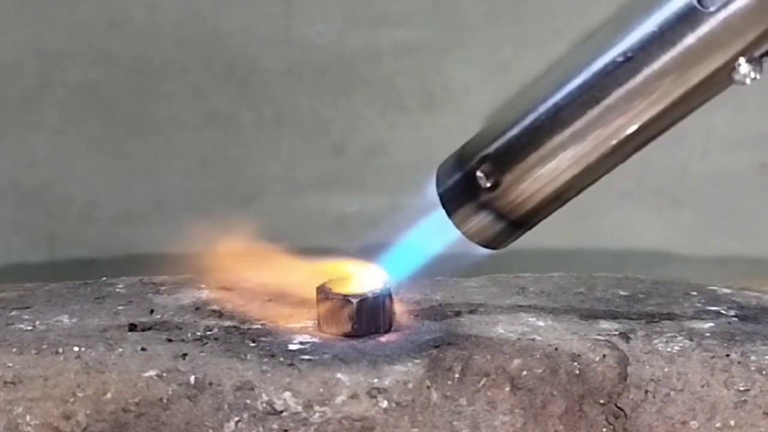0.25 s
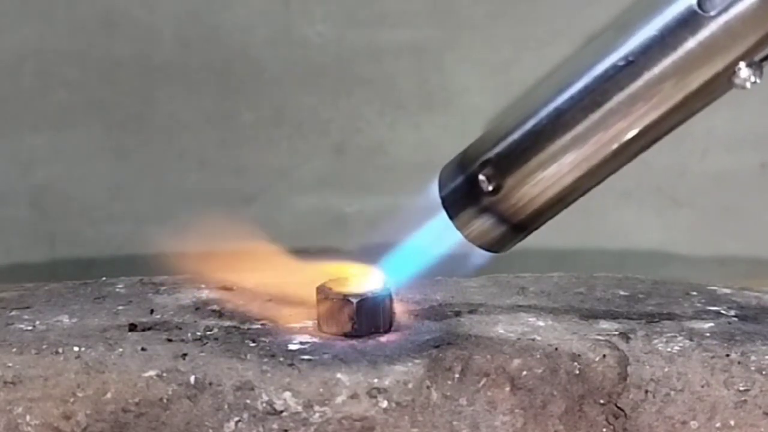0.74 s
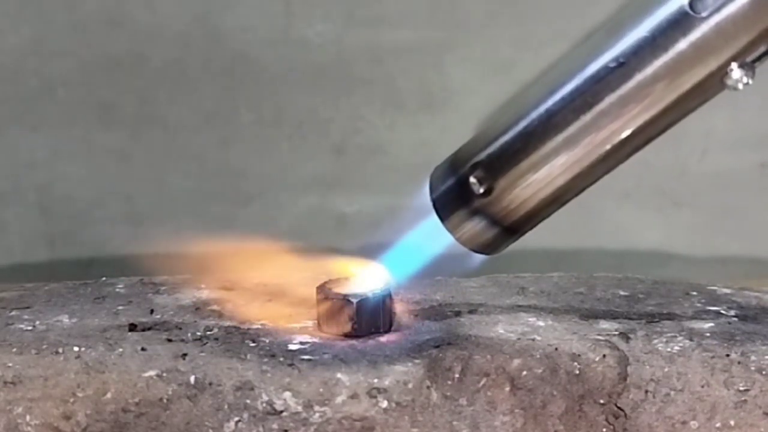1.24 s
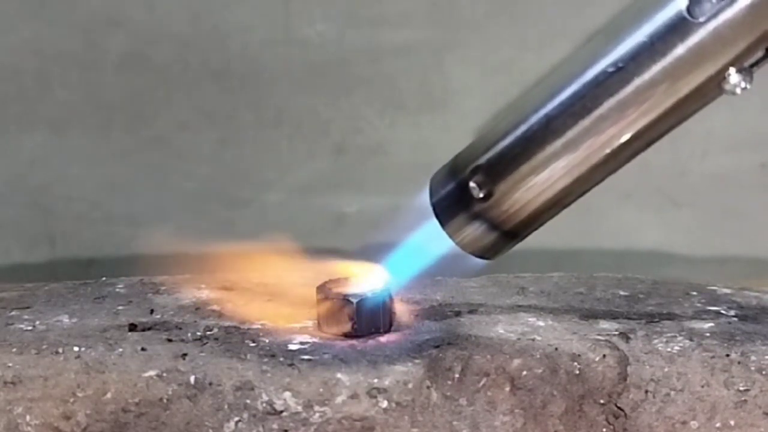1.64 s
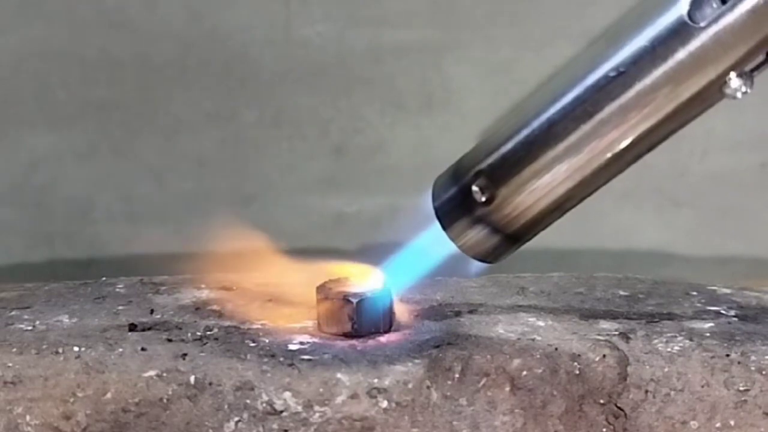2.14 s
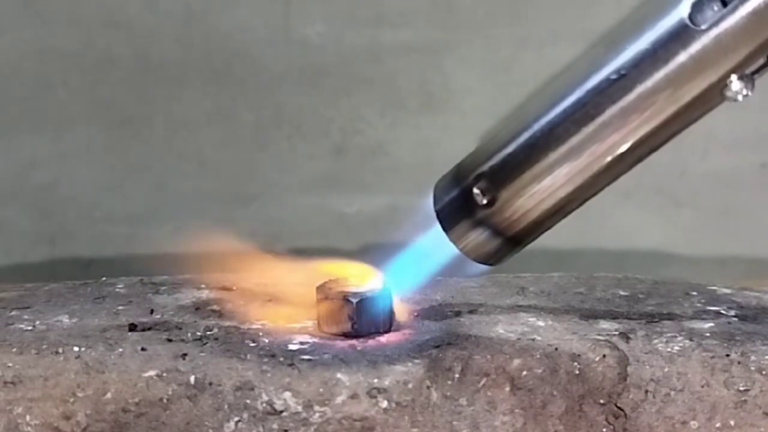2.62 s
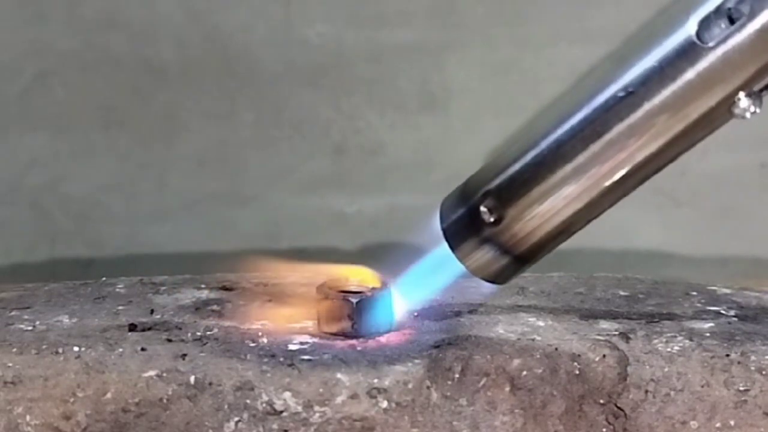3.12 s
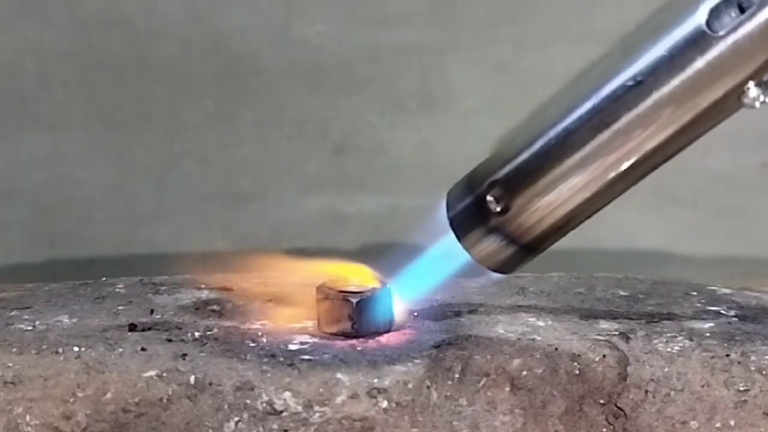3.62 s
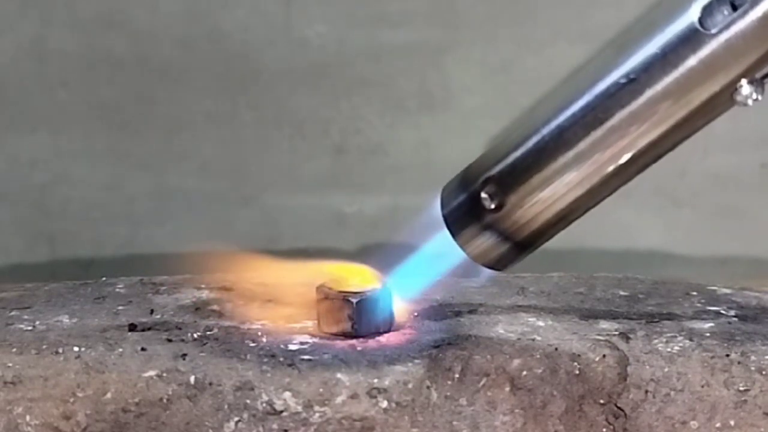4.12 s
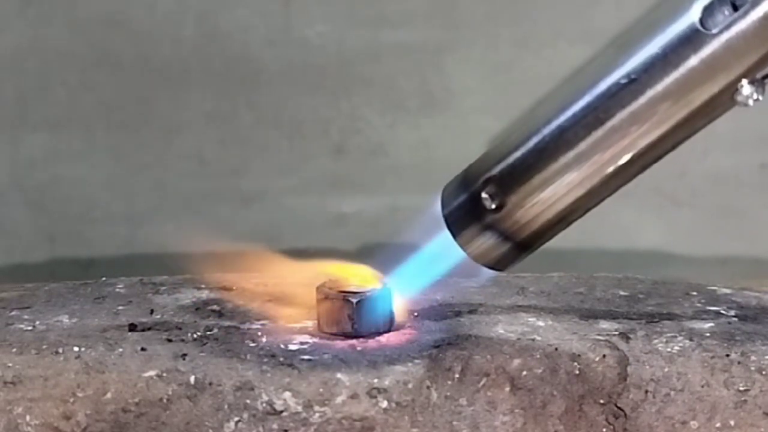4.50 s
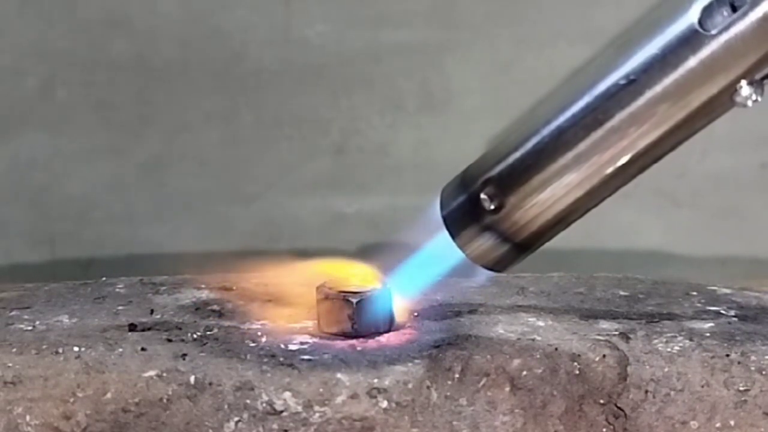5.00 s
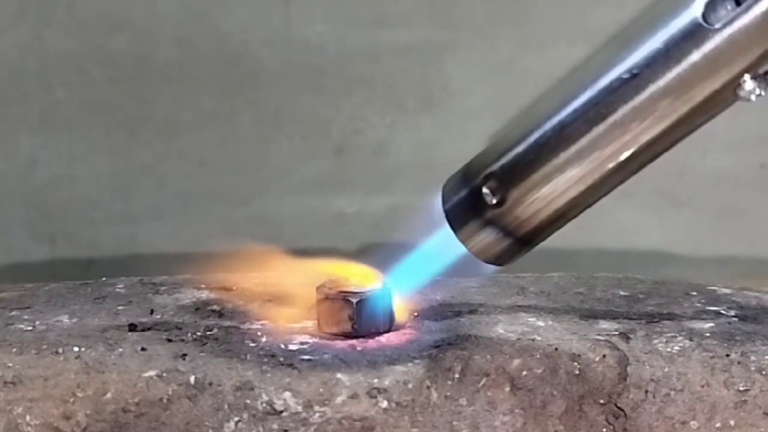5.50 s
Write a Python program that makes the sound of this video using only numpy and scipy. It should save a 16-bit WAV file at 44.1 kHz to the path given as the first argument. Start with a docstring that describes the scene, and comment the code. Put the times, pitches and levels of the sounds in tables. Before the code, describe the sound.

The steady, slightly hollow roar and hiss of a gas torch flame heating a small metal piece.

```python
"""Gas torch in a hard-walled room

A handheld torch plays on a small metal piece, close to a microphone with two openings (ports).
The swirling flame roars and the gas jet hisses; bench and walls colour both. The right port sits
behind a hollow that rings near 630 Hz, and it hears the jet about half a millisecond late."""
import sys
import numpy as np
from scipy import signal
from scipy.fft import rfft, irfft, next_fast_len
from scipy.io import wavfile
from scipy.ndimage import uniform_filter1d, minimum_filter1d

SR = 44100
rng = np.random.default_rng(int(sys.argv[2]) if len(sys.argv) > 2 else 0)


def dump_mix(stems):
    """Bounce the given channels to the path in sys.argv[1] as a 16-bit WAV at rate SR."""
    frames = np.atleast_2d(stems).T  # one column per channel
    limited = np.clip(frames, -1, 1)  # hard clip at full scale
    pcm = np.round(limited * 32767).astype(np.int16)
    wavfile.write(sys.argv[1], SR, pcm)


N = 253575
SIZE = next_fast_len(N + SR // 2)  # samples, with space for the echoes
HZ = np.arange(SIZE // 2 + 1) * SR / SIZE + 1e-3  # the frequencies of a spectrum


def torch_flame(count):
    """Swirling gas rumbles, roars and hisses: spectra of `count` noises that flicker together."""
    # slow drift in loudness: (time [s], rumble [dB], roar [dB], jet [dB])
    drift = [(0, 1, 0, -1.8), (.7, 0.5, 2.3, -2), (1.2, 1.1, 1.2, -1.5), (1.7, 1.2, 1.7, -0.8),
             (2.2, 1, 1.8, -0.2), (2.65, 2.1, 3.5, 1.3), (3.1, 0.7, 1.7, 0.5), (3.6, 0.7, 0.5, 0.4),
             (4.1, 1.8, -0.6, 2), (4.6, 1.1, 0.5, 1.3), (5.1, 1, 1.5, 0.1), (5.75, 2, 1.5, -0.1)]
    # quick random flicker: (rate [changes per s], depth [dB])
    flicker = [(4, .15), (10, .6), (20, .7)]
    # the flame's overall tone: (frequency [Hz], level [dB])
    tone = [(25, -19.0), (45, -25.5), (90, -14.4), (200, -17.9), (330, -6.6), (450, 0.0), (700, -10.9),
            (1100, -14.2), (1600, -19.1), (3000, -20.6), (4500, -26), (7000, -29.8), (10000, -40),
            (15000, -51.1)]
    # standing waves of tube, bench and walls: (frequency [Hz], width [Hz], gain [dB])
    standing_waves = [(86, 14, -1.4), (143, 18, 3.0), (187, 23, -7.5), (231, 29, 2.3), (278, 40, -1.5),
                      (313, 23, 6.3), (346, 19, -4.5), (358, 16, -1.9), (407, 34, 2.4), (432, 20, 1),
                      (452, 20, -2.5), (480, 28, 2), (525, 41, -1.8), (600, 32, 4.8), (632, 27, -5.7),
                      (717, 50, 5.5), (879, 53, -7.1), (991, 53, 2.6), (1030, 60, 1), (1076, 45, 4.8),
                      (1125, 30, -2.5), (1205, 25, -4.5), (1160, 50, 1), (1257, 60, 5), (1300, 25, -2.5),
                      (1372, 30, -7.2), (1483, 44, -2.5), (1530, 30, 2), (1680, 54, 3.0), (1835, 120, 4.6),
                      (2113, 172, -2), (2150, 40, -2), (2240, 50, 2), (2327, 189, 4.8), (2620, 485, -3.1),
                      (3070, 130, 2), (3350, 70, -2), (3500, 220, 1.5), (3820, 120, -1), (4159, 479, 1.6),
                      (4330, 100, 1), (4580, 180, -5.5), (4750, 150, 2), (4950, 100, -1), (5502, 442, -4.7),
                      (6050, 300, 3.8), (6470, 200, 2.2), (6740, 80, 2), (8650, 352, 2.6),
                      (9543, 264, -3.8), (11036, 895, -2.6), (12171, 326, 3.3), (12950, 500, 3.5),
                      (14300, 800, 4.5), (15150, 400, -7)]
    rumble_top_hz, roar_top_hz, hiss_from_hz = 500, 900, 6000
    times, rumble_db, roar_db, jet_db = np.transpose(drift)
    t = np.arange(SIZE) / SR
    spectra = np.zeros((count, len(HZ)), complex)
    for hz in 25 * 2. ** np.arange(10):  # bands an octave apart
        drift_db = rumble_db if hz < rumble_top_hz else roar_db if hz < roar_top_hz else jet_db
        db = np.interp(t, times, drift_db)
        if hz > hiss_from_hz:  # the nozzle's thin hiss follows the drift only in part
            db *= 0.22
        db += sum(depth_db * wander(rate) for rate, depth_db in flicker)
        # neighbouring bands add up to even power
        band = np.cos(np.pi / 2 * np.clip(np.log2(HZ / hz), -1, 1))
        spectra += band * rfft(from_db(db) * rng.standard_normal((count, SIZE)))
    return spectra * tone_curve(tone) * peaks_and_dips(standing_waves)


def right_port():
    """A filter: the hollow passes bass and rings; treble leaks in later round the microphone's body."""
    # how the body shades the treble: (frequency [Hz], gain [dB])
    shade = [(1000, -1.2), (1500, 1.4), (2700, -5.6), (3600, 0.5), (5000, -0.2), (7500, -8.8), (9300, 0.7),
             (15000, 0.2)]
    # extra lag from longer ways round the body: (frequency [Hz], phase lag [radians])
    detour_lag = [(600, 0), (900, .3), (1300, -.22), (1550, -2), (1950, -.6), (2220, 3.7), (2450, 4.2),
                  (2950, 6.3), (3740, 6.5), (4000, 12.2), (4330, 12.3), (4540, 13.3), (4650, 12.1),
                  (4850, 12.8), (5350, 12.9), (6000, 17.1), (6600, 17.8), (7000, 19.9), (9000, 26.8)]
    # peaks and dips at this port only: (frequency [Hz], width [Hz], gain [dB])
    colour = [(191, 9, -4.4), (236, 40, -3.1), (286, 23, -2.1), (348, 53, -2.0), (449, 26, -4),
              (480, 70, -2.5), (609, 66, 3.2), (637, 25, -5.1), (673, 46, 3.3), (798, 46, -2.6),
              (877, 54, 6.9), (1000, 120, -1.5), (1069, 45, -.5), (1160, 80, 1.5), (1205, 25, 3),
              (1260, 50, -2.5), (1372, 32, 8.9), (1419, 47, -7.4), (1473, 30, 6.0), (1610, 66, 1.7),
              (1675, 39, -5.8), (1797, 162, 4.6), (1980, 60, -2), (2078, 68, 4.5), (2158, 45, -4.2),
              (2225, 70, 5.5), (2270, 25, -5), (2770, 194, -2.3), (3050, 70, 3), (3180, 120, -1.5),
              (3500, 145, 3.5), (3810, 130, -6), (3950, 90, 3), (4305, 166, 2.8), (4570, 90, -2.5),
              (4974, 169, -2.8), (5200, 120, 1.5), (5506, 208, 2.9), (5850, 150, -2), (6010, 110, 1.5),
              (6409, 237, 2), (7200, 500, 2), (7800, 500, -2.5), (9200, 350, 4)]
    ring_hz, ring_width_hz = 634.4, 17
    leak_hz, lag_s = 838, .000567
    hollow = 1 / (1 - (HZ / ring_hz) ** 2 + 1j * HZ * ring_width_hz / ring_hz ** 2)
    delay = np.exp(-2j * np.pi * HZ * lag_s)
    leak = tone_curve(shade) * delay / (1 + (leak_hz / HZ) ** 2)
    detour = np.exp(-1j * np.interp(HZ, *np.transpose(detour_lag)))
    return (hollow + leak) * detour * peaks_and_dips(colour)


def near_echoes():
    """A filter for each port: the direct sound plus quick echoes off the bench and near walls."""
    # echoes compared with the direct sound: (frequency [Hz], level [dB])
    echo_levels = [(30, -24), (1150, -18), (1450, -8), (3000, -12), (6000, -12), (15000, -13)]
    decay_s = 0.19  # time to fade by 60 dB
    t = np.arange(SR // 2) / SR
    tails = rng.standard_normal((2, len(t))) * from_db(-60 * t / decay_s)
    tails /= np.sqrt(np.sum(tails ** 2, -1, keepdims=True))
    echo_gain = tone_curve(echo_levels)
    return (1 + echo_gain * rfft(tails, SIZE)) / np.sqrt(1 + echo_gain ** 2)


def room_wash(direct, scattered):
    """Blends in sound scattered round the room, different at each port, keeping the power the same."""
    # scattered sound compared with the direct sound: (frequency [Hz], level [dB])
    wash_levels = [(30, -19), (600, -17), (1250, -15), (2350, -12), (3450, -9), (6300, -6), (8200, 3),
                   (10500, -1), (15000, 2)]
    # where the direct sound cancels and the room takes over: (frequency [Hz], width [Hz], boost [dB])
    shadows = [(880, 60, 6), (1210, 120, 5), (1410, 90, 13), (1570, 60, 6), (1750, 500, 8), (2130, 220, 12),
               (2600, 260, 12), (2800, 80, 5), (3150, 300, 2), (3870, 200, 10), (4560, 180, 10),
               (5000, 200, 5), (5650, 500, 10), (6800, 400, 5)]
    wash_gain = tone_curve(wash_levels) * peaks_and_dips(shadows)
    return (direct + wash_gain * scattered) / np.sqrt(1 + wash_gain ** 2)


def from_db(db):
    """Turns decibels into a gain to multiply by."""
    return 10 ** (np.asarray(db) / 20)


def tone_curve(points):
    """Gain at every frequency, from a line through (frequency [Hz], level [dB]) points."""
    hz, db = np.transpose(points)
    return from_db(np.interp(np.log(HZ), np.log(hz), db))


def peaks_and_dips(bells):
    """Gain at every frequency, from bell-shaped boosts and cuts."""
    return from_db(sum(db / (1 + (2 * (HZ - hz) / width) ** 2) for hz, width, db in bells))


def wander(rate):
    """A smooth random wobble, about 1 in size, that changes `rate` times a second."""
    hold = int(SR / rate)
    steps = np.repeat(rng.standard_normal(SIZE // hold + 1), hold)[:SIZE]
    return 1.33 * uniform_filter1d(uniform_filter1d(steps, hold), hold)


def scene():
    """The torch reaches both ports directly and by way of the room; the right one is coloured further."""
    left_level_db = -24.5
    flame = torch_flame(count=3)
    heard = near_echoes() * room_wash(direct=flame[0], scattered=flame[1:])
    heard[1] *= right_port()
    ports = irfft(heard, SIZE)[:, :N]
    return ports * from_db(left_level_db) / ports[0].std()


def record(dry):
    """Turns down any peak above the ceiling, fades in quickly and cuts the highest treble."""
    ceiling, fade_s, top_hz = .97, .003, 15250
    hold = SR // 100
    limiter = np.minimum(1, ceiling / (np.abs(dry).max(0) + 1e-9))
    limiter = uniform_filter1d(minimum_filter1d(limiter, 2 * hold), hold)
    fade_in = np.minimum(1, np.arange(N) / SR / fade_s)
    treble_cut = signal.ellip(12, .2, 80, top_hz, fs=SR, output="sos")
    return signal.sosfilt(treble_cut, limiter * fade_in * dry)


dry = scene()
out = record(dry)
dump_mix(out)
```